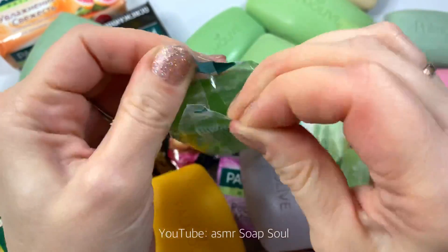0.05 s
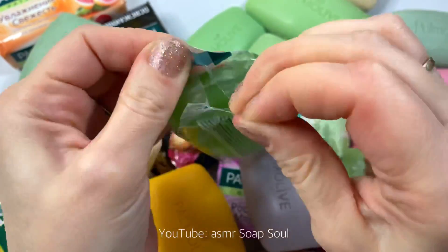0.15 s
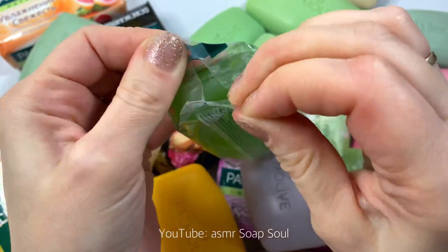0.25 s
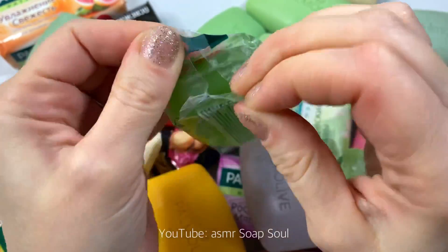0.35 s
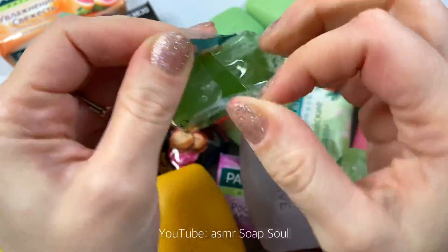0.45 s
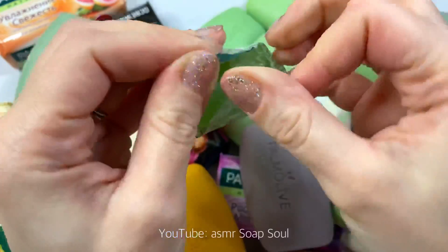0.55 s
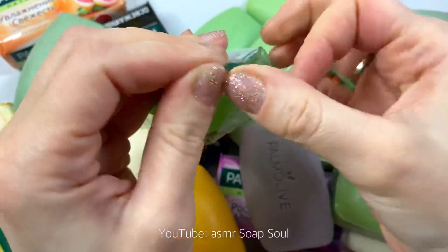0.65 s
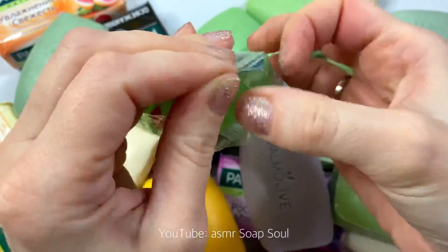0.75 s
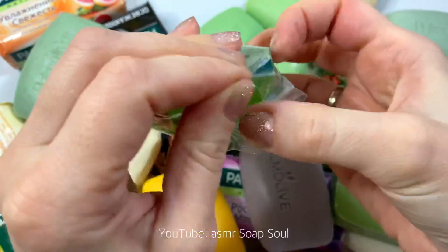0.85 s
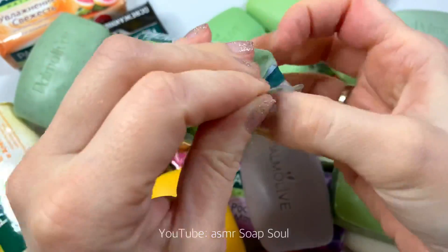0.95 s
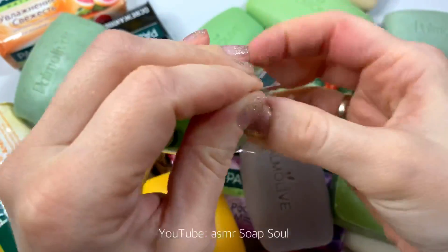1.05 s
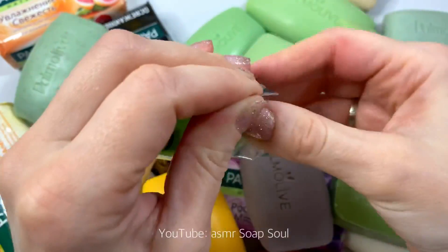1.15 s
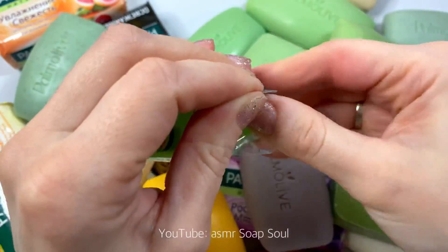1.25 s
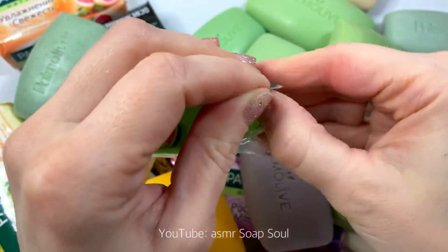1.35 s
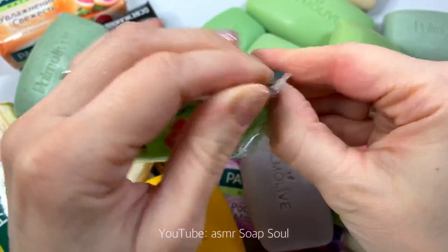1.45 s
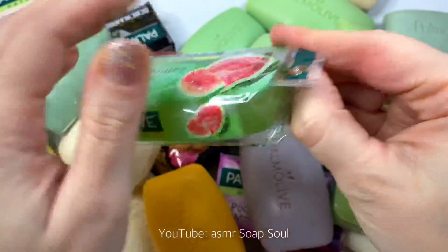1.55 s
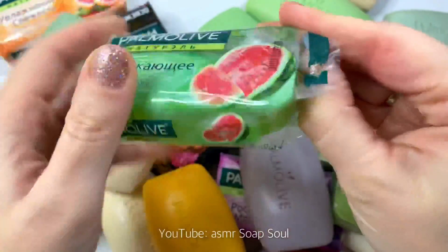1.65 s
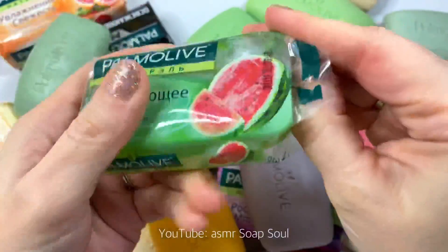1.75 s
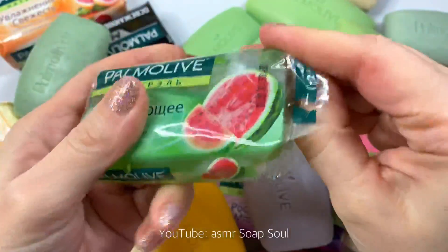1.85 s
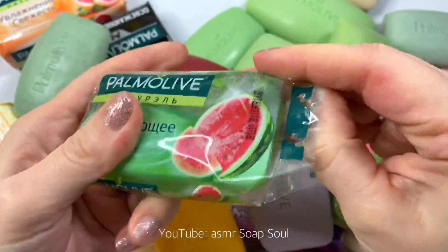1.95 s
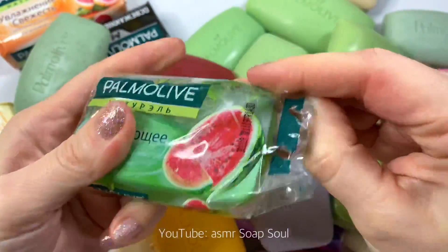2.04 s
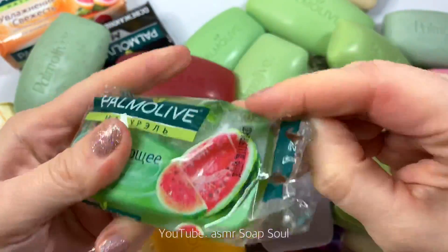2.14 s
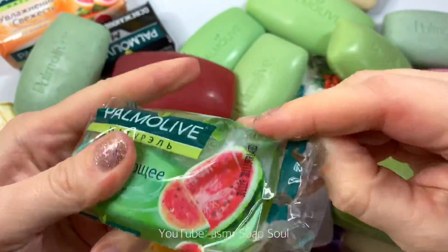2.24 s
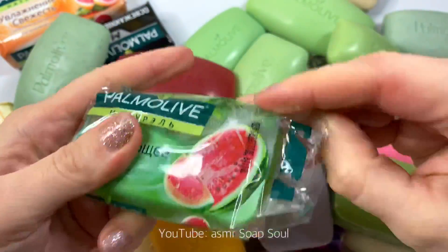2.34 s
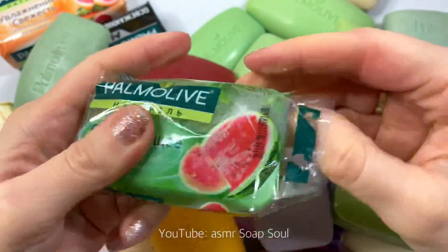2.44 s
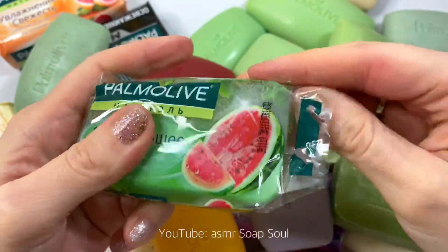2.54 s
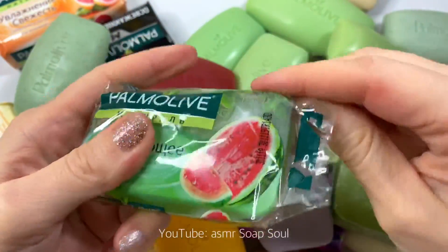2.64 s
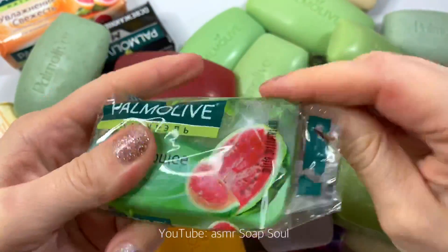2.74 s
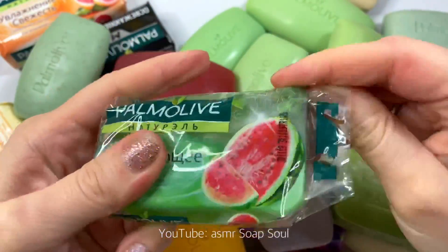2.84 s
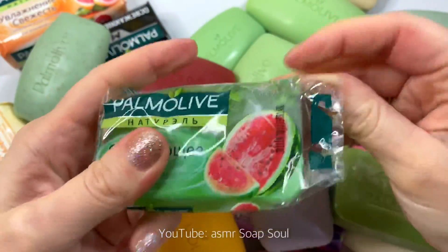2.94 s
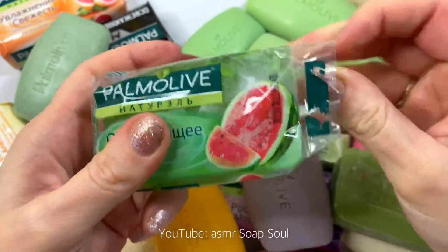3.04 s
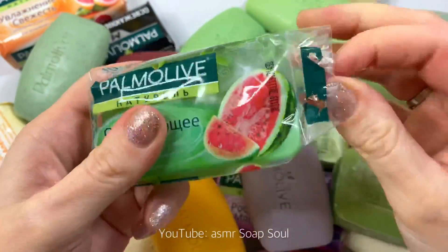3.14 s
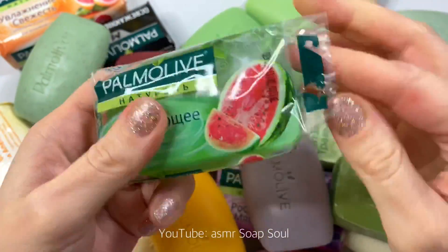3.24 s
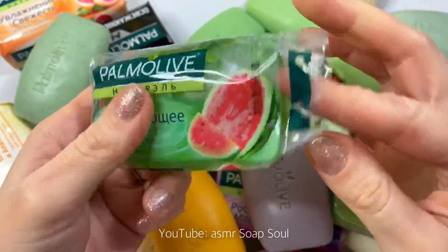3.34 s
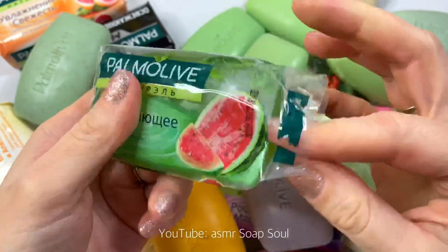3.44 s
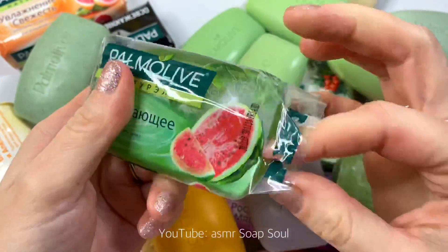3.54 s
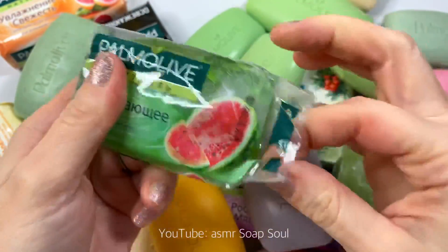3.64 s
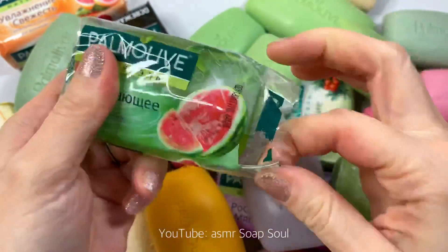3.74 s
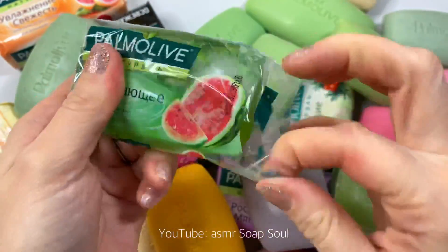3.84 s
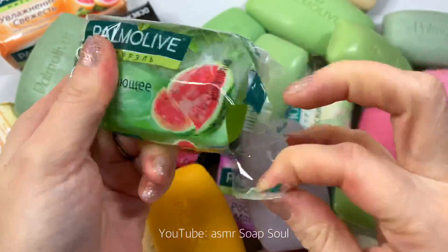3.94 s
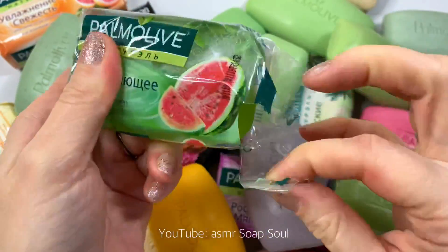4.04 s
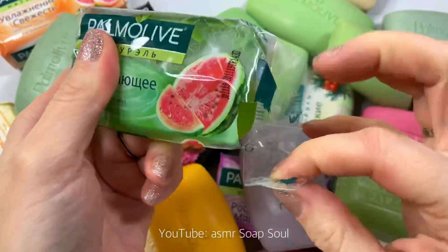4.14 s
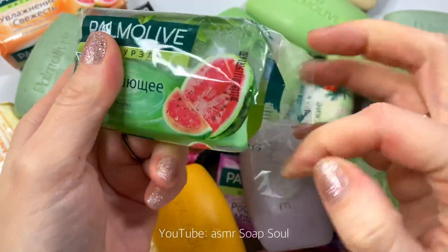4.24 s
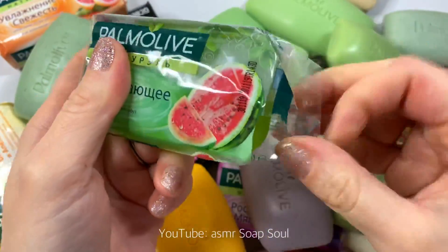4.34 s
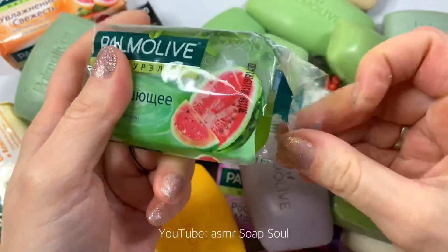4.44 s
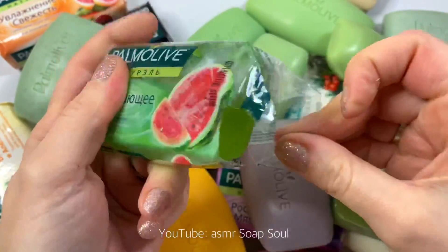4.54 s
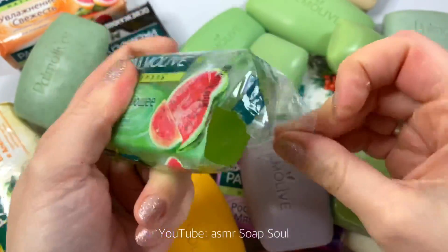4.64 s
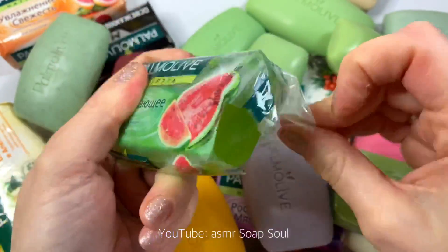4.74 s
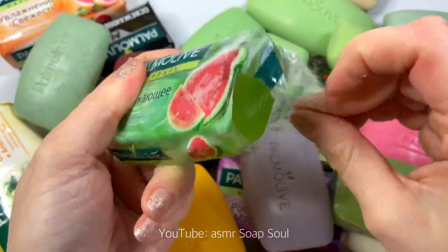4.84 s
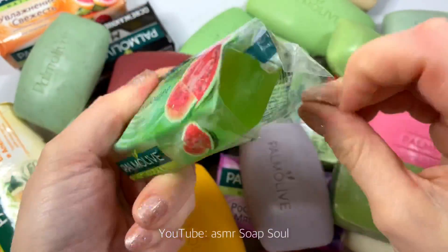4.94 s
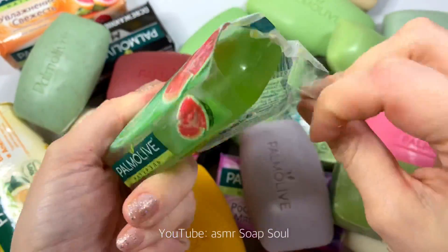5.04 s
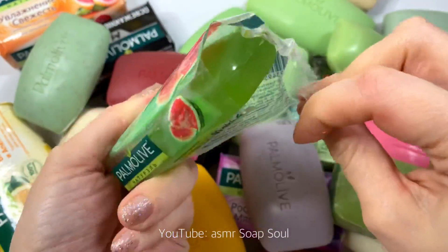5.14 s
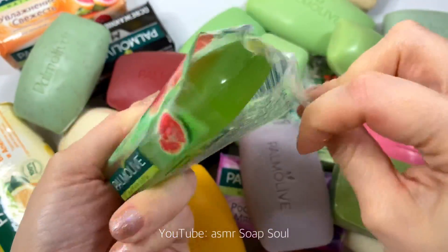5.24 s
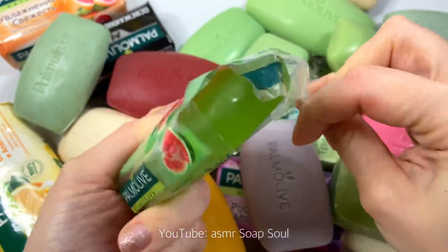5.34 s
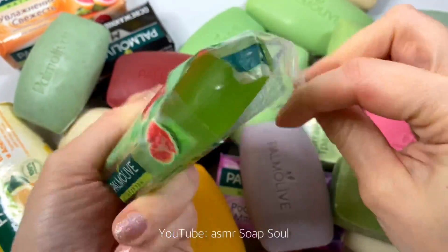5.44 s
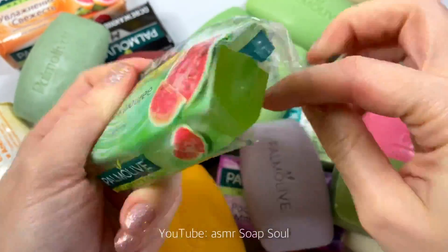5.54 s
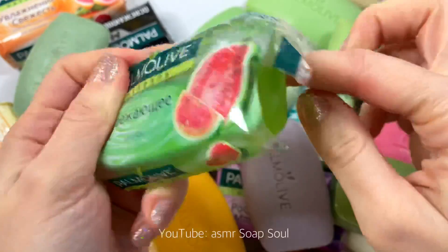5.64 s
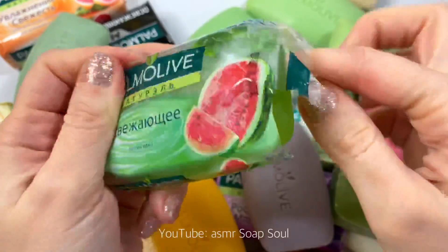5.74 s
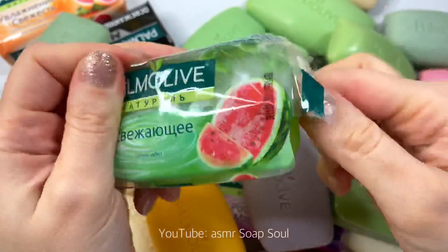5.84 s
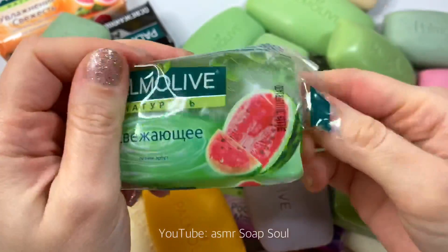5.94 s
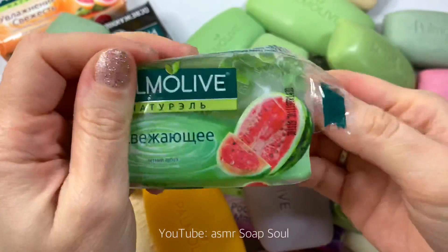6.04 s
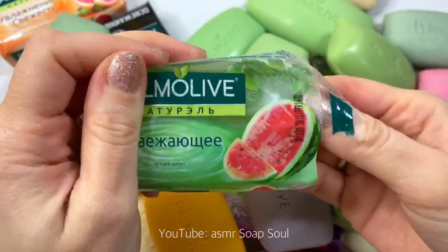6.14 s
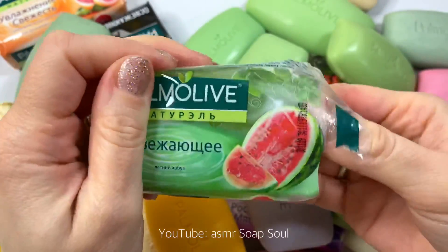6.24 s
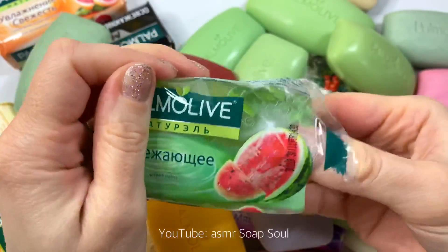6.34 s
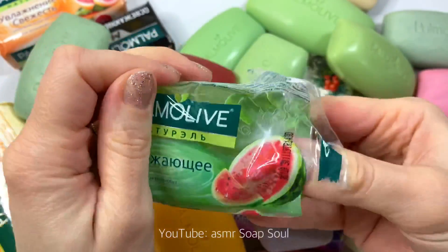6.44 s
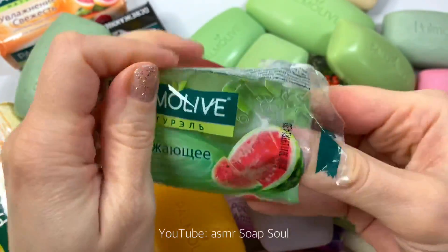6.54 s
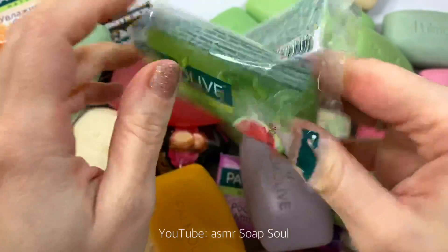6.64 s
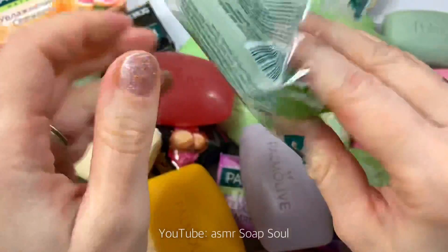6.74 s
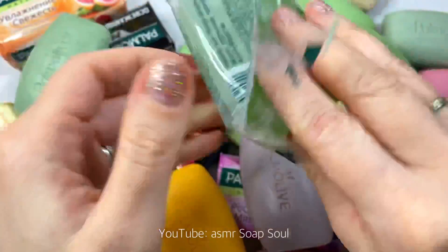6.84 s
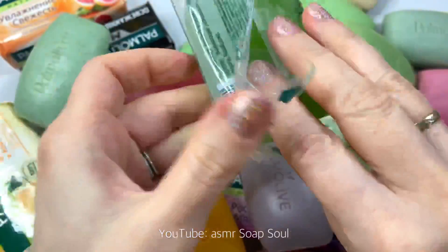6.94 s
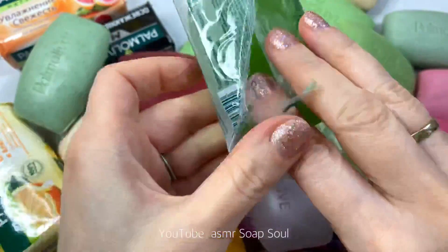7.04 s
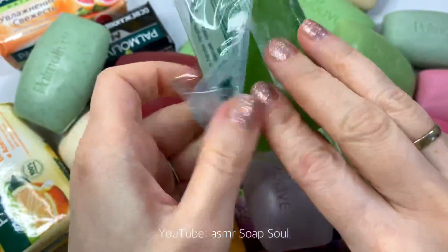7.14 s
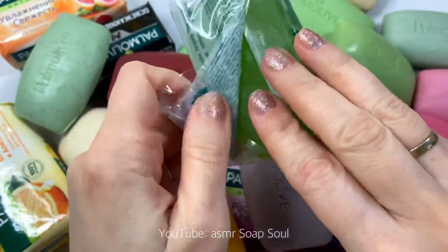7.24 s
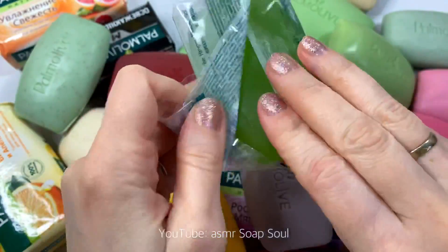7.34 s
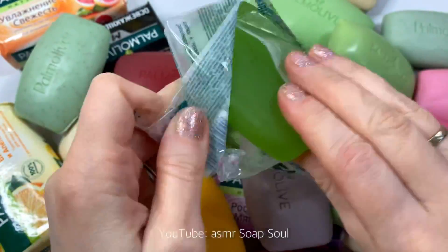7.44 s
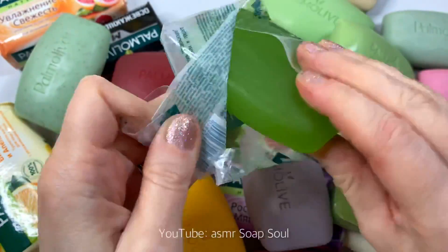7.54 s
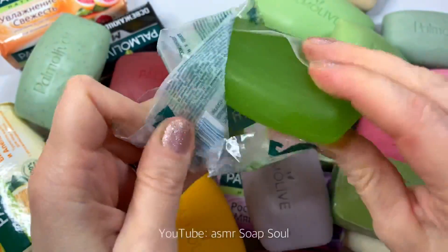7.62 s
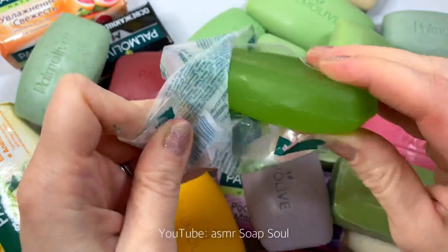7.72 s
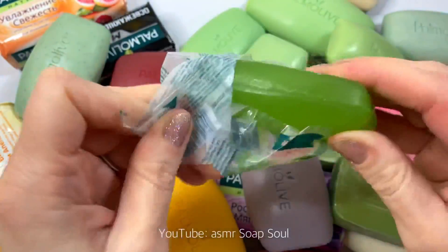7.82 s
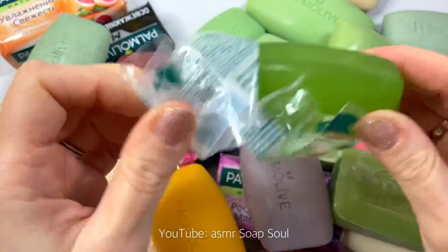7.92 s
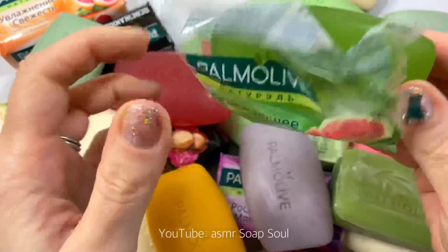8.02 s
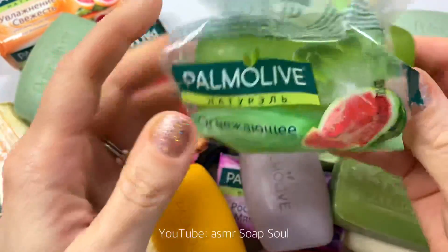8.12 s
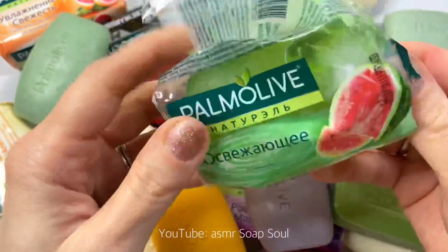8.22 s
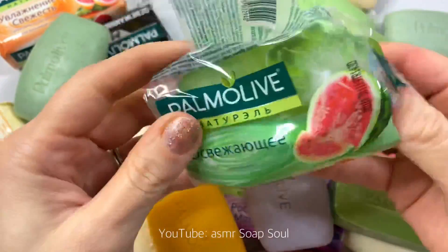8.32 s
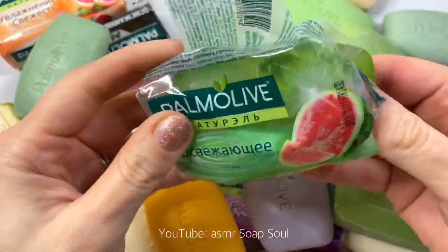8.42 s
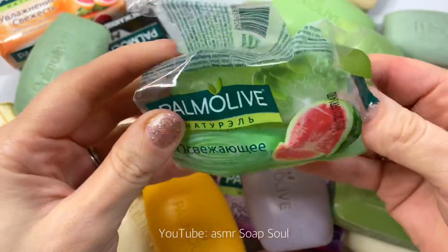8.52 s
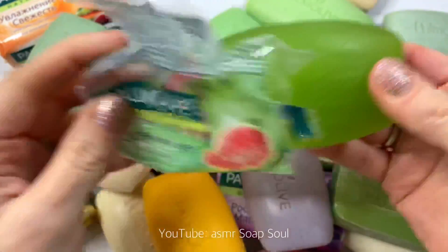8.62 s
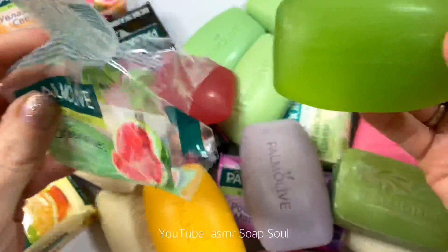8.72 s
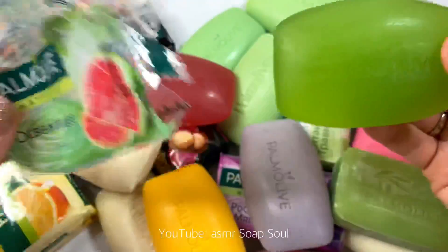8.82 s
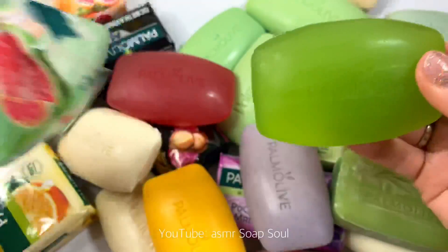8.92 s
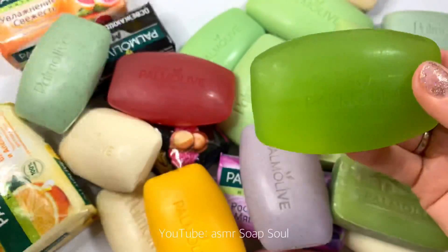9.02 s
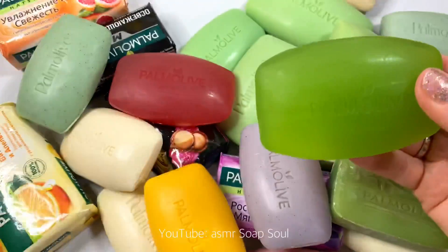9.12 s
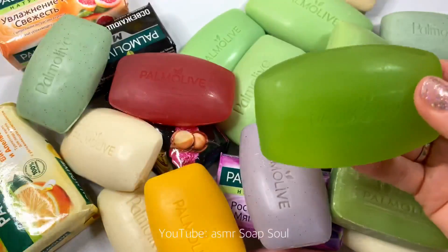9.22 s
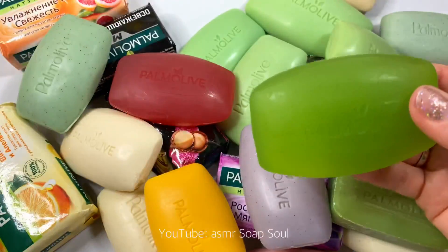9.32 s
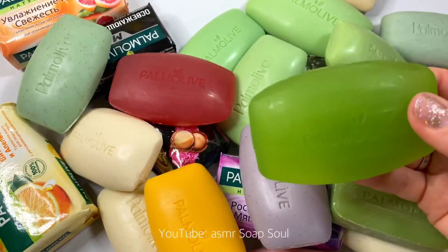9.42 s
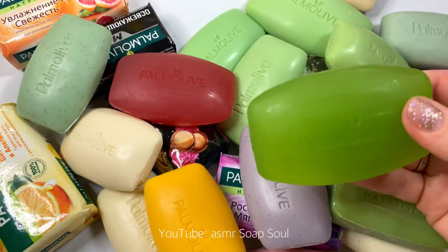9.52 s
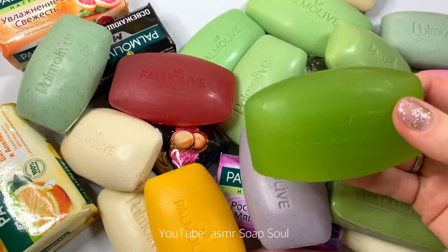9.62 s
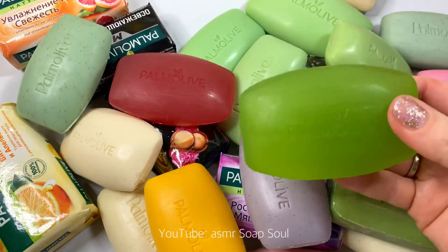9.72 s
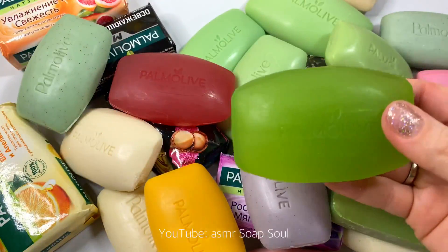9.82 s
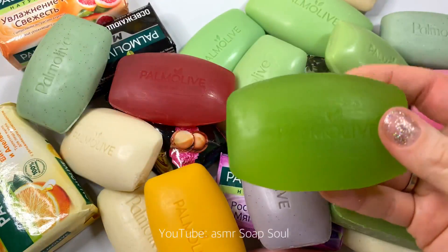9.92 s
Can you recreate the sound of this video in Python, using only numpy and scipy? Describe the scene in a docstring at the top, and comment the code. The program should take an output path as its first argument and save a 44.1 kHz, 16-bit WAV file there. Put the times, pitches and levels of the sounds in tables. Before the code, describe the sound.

Close, dry crinkling of thin plastic film around a bar of soap in a small quiet room. After a brief faint rustle, sharp bright snaps start at about 0.3 s, with a tearing run and irregular strong pops up to 1.6 s. From 1.7 to 3 s the crackling gets denser, with some lower, hollow pops. Between 3.3 and 4.3 s soft dull finger bumps on the bar mix with crisp snaps and short slides. Bright crackles and flickering hiss continue from 4.5 to 6.6 s, with more bumps near 5.3 and 5.6 s. A lull follows from 6.7 to 7.1 s. Dense crushing and tearing return at 7.2 to 7.9 s with low thumps, ease briefly, then surge at 8.4 to 8.8 s as the film comes away. After 8.9 s only faint air, slightly stronger low hum, and tiny rubs and ticks near 9.85 s remain.

```python
"""Thin plastic film is crinkled and torn off a bar of soap, close to a phone in a small quiet room.
Each crease buckles as a noise burst of a few milliseconds in several bands; small crackles, runs of
tearing and a flickering hiss of sliding film fill in between. Fingers bump the bar as sagging low
tones and rub it as band-passed noise. The room adds a short noise tail, over faint air and hum."""
import sys
import numpy as np
from scipy import signal
from scipy.fft import rfft, irfft, next_fast_len
from scipy.io import wavfile
from scipy.ndimage import uniform_filter1d

SR = 44100
rng = np.random.default_rng(int(sys.argv[2]) if len(sys.argv) > 2 else 0)


def pcm_store(signal):
    """Save signal as 16-bit PCM."""
    levels = np.round(np.clip(np.atleast_2d(signal), -1, 1) * 32767)
    wavfile.write(sys.argv[1], SR, levels.astype(np.int16).T)


def rack_gain(trim_db):
    """Turn a fader trim in dB into the linear factor to multiply a signal by."""
    fader = np.asarray(trim_db, float)
    return 10 ** (fader / 20)


N = 439677  # samples


def curve(table, at):
    """A (Hz, value) table read on a log axis."""
    hz, value = np.transpose(table)[:2]
    return np.interp(np.log(at + 1), np.log(hz + 1), value)


def over_time(table, s):
    """A (seconds, value) table read along straight lines."""
    return np.interp(s, *np.transpose(table))


def shaped(x, gain):
    """Multiply the spectrum of x by gain(Hz)."""
    size = next_fast_len(x.shape[-1])
    hz = np.arange(size // 2 + 1) * SR / size
    return irfft(rfft(x, size) * gain(hz), size)[..., :x.shape[-1]]


def hump(f, hz, width):
    """A bell-shaped gain around hz, its width in natural-log units of frequency."""
    return np.exp(-.5 * (np.log((f + 1) / hz) / width) ** 2)


def fade(t, t60):
    """Amplitude falling 60 dB in t60."""
    return np.exp(-np.log(1000) * t / t60)


def swell(t, rise):
    """A smooth onset that has mostly risen after the time rise."""
    return 1 - np.exp(-(t / rise) ** 2)


def add(out, s, grains):
    """Lay grains (events, 2, length) into out at times s."""
    at = (s * SR).astype(int)[:, None] + np.arange(grains.shape[-1])
    for ch in range(2):
        out[ch] += np.bincount(at.ravel(), grains[:, ch].ravel(), N + SR)[:N]
    return out


# Air of the still room. Each row: frequency in Hz, relative density in dB per Hz.
AIR_SPECTRUM = [(25, -17.5), (90, 5.5), (626, -26), (5860, -43), (11000, -45), (13300, -32.5), (17000, -66)]
# Low hum of the room. Each row: centre in Hz, level before the swell in dB.
HUM_BANDS = [(48.4, -64.5), (102.3, -68.5)]
# The hum is louder once the hands rest. Each row: time in seconds, dB added to the hum.
HUM_RISE = [(8.8, 6.5), (9.2, 13.5)]


def quiet():
    """Faint air noise, and a hum that wavers because it is noise in narrow low bands."""
    air = shaped(rng.standard_normal((2, N)), lambda f: rack_gain(curve(AIR_SPECTRUM, f)))
    out = rack_gain(-58) * air / air.std()
    rise_db = over_time(HUM_RISE, np.arange(N) / SR)
    for hz, db in HUM_BANDS:
        noise = rng.standard_normal(N) + .5 * rng.standard_normal((2, N))
        hum = shaped(noise, lambda f: 1 / (1 + ((f - hz) / 6) ** 2))
        out += rack_gain(db + rise_db) * hum / hum.std()
    return out


# Hiss of film on film. Each row: frequency in Hz, relative density in dB per Hz.
RUSTLE_SPECTRUM = [(300, -32), (700, -1.5), (3000, -2), (7000, -2.5), (15000, -13.5)]
# How hard the film is worked. Each row: time in seconds, rustle level before flicker in dB.
HAND_WORK = [(0, -47.5), (.1, -68), (.25, -71), (.3, -62), (.44, -52), (1.12, -63), (1.2, -52),
             (1.66, -49.5), (2.6, -54), (2.85, -64.5), (3.1, -53.5), (3.52, -51), (3.7, -53.5),
             (4.3, -51.5), (4.43, -64), (4.55, -48.5), (5.35, -53.5), (6.58, -53.5), (6.75, -61),
             (7.0, -68), (7.1, -51.5), (7.41, -52), (7.9, -50), (8.05, -63), (8.44, -49), (8.66, -45.5),
             (8.91, -72), (9.3, -91)]


def rustle():
    """Film slides over film: a soft flickering hiss that follows the working of the hands."""
    noise = rng.standard_normal((3, N))
    hiss = shaped(noise[:1] + 1.1 * noise[1:], lambda f: rack_gain(curve(RUSTLE_SPECTRUM, f)))
    t = np.arange(N) / SR
    knots = np.arange(0, N / SR + 1, 0.0076)  # seconds between turns of the flicker
    flicker_db = 2.5 * np.interp(t, knots, rng.standard_normal(len(knots)))
    # the slide also halts and goes on, eight times slower
    slow = knots[::8]
    flicker_db += 4 * np.interp(t, slow, rng.standard_normal(len(slow)))
    return hiss / hiss.std() * rack_gain(over_time(HAND_WORK, t) + flicker_db)


# Air between film and bar. Each row: resonance in Hz, width in Hz, peak in dB.
AIR_GAP = [(840, 99, 6.5), (1580, 43, 4.5)]
# Film bands: 60 dB fall of the first stage, before patch size alters it, for lows, middle
# and top, in seconds.
BAND_RING_S = (0.0097, 0.0071, 0.0038)
# Share of amplitude of its own on each side, for lows and middle [0 to 1].
SIDE_SHARE = (.45, .6)


def snap(db, patch_hz, low_db, mid_db, top_db, size):
    """A crease flips: a burst in lows, middle, top and one ringing patch, the higher bands shorter."""
    low_hz, split_hz, top_hz = 250, 620, 8000  # edges of lows, middle and top
    t, hz = np.arange(size) / SR, np.arange(size // 2 + 1) * SR / size
    above = lambda edge: 1 / np.sqrt(1 + (edge / (hz + 1)) ** 8)
    below = lambda edge: 1 / np.sqrt(1 + (hz / edge) ** 8)
    patch = hump(hz, patch_hz[:, None, None], 0.21)
    body_db = sum(peak_db / (1 + (2 * (hz - at) / width) ** 2) for at, width, peak_db in AIR_GAP)
    # every crease has its own hills and valleys over the octaves
    octave, turn = np.log2(hz + 1), 2 * np.pi * rng.random((len(db), 1, 2))
    ripple = np.cos(2 * octave + turn[..., :1]) + np.cos(2 * np.pi * octave + turn[..., 1:])
    body = rack_gain(body_db) * rack_gain(2.8 * ripple)
    bands = (above(low_hz) * below(split_hz), body * above(split_hz) * below(top_hz), above(top_hz), patch)
    rings = tuple(BAND_RING_S) + (0.0063,)
    low, mid = np.clip(SIDE_SHARE, 0, 1)
    shares = (low, mid, .25, mid)
    # large slack patches pop more strongly: 4 dB per octave under 1800 Hz
    pop_db = -2.5 + 4 * np.clip(np.log2(1800 / patch_hz), 0, 2)
    levels = (low_db, mid_db, top_db, pop_db)
    late_levels = (-9.5, -9.5, -9.5, -17.5)  # dB of a weaker, longer second stage
    # small stiff patches ring high and die sooner
    quick = np.clip(patch_hz / 3000, .6, 2.2)[:, None, None] ** .5
    noise = rfft(rng.standard_normal((len(db), 3, size)))
    parts = []
    for band, ring, share, band_db, late_db in zip(bands, rings, shares, levels, late_levels):
        pair = np.sqrt(1 - share ** 2) * noise[:, :1] + share * noise[:, 1:]
        first = fade((t * quick) ** 2, ring ** 2)
        second = rack_gain(late_db) * fade(t, 6.1 * ring)
        burst = irfft(pair * band, size) * (first + second) * swell(t, 0.14 * ring)
        # set each burst to its given level, as energy spread over 3.8 ms
        burst /= np.sqrt(np.sum(burst ** 2, axis=(1, 2), keepdims=True) / (0.0038 * SR))
        parts.append(burst * rack_gain(db + band_db)[:, None, None])
    # keep middle, top and patch clear of the lows
    return parts[0] + irfft(rfft(sum(parts[1:])) * above(0.57 * split_hz), size)


# Creases that buckle close by. Each row: start in seconds, level in dB, loudest patch in Hz,
# top band relative to that level in dB.
CREASES = [(0.1197, -38, 6000, 2.5), (0.222, -48, 4760, -0.5), (0.2775, -20, 3350, -5.5),
           (0.321, -26.5, 5200, 0), (0.381, -34.5, 5000, 4), (0.4088, -15.5, 4700, -3),
           (.417, -11.5, 8200, 3), (0.4994, -12, 5500, 5.5), (0.614, -26.5, 5400, -27.5),
           (0.6972, -33.5, 1210, -21.5), (.749, -5.5, 6050, -12), (0.799, -29.5, 7500, 20.5),
           (0.8906, -14, 2580, -33.5), (0.9659, -18, 5960, 8), (1.1845, -11.5, 6500, -9),
           (1.193, -15, 6430, -2.5), (1.217, -27, 3240, -23), (1.245, -31, 2520, -13.5),
           (1.292, -13, 5100, -36), (1.419, -24, 4550, -9.5), (1.4893, -14.5, 3830, 4.5),
           (1.524, -20.5, 4760, 2), (1.6233, -21.5, 4130, -25.5), (1.732, -14, 5060, 10.5),
           (1.771, -24, 2470, -26.5), (1.812, -11, 5570, -5.5), (1.8458, -15, 2770, 4),
           (1.9077, -22, 2660, -5.5), (1.9875, -24, 4380, -7.5), (2.038, -31, 3000, 4.5),
           (2.091, -17, 6850, 2.5), (2.19, -23, 700, -28.5), (2.207, -28, 650, -36),
           (2.2683, -26, 3020, -9), (2.29, -26.5, 3020, -11), (2.357, -21, 5000, -16.5),
           (2.413, -24.5, 730, -16), (2.4334, -11, 714, -8), (2.477, -19, 4870, -25),
           (2.52, -36, 1520, -16.5), (2.597, -26.5, 900, -16), (2.622, -13.5, 3280, -25),
           (2.639, -22.5, 1570, -12.5), (2.7049, -19, 920, -6), (2.757, -29.5, 2460, -2.5),
           (2.807, -32, 890, -32), (2.864, -42.5, 2430, -6), (2.8863, -24.5, 6650, 0),
           (2.9084, -18, 7000, -1), (2.9367, -21, 2220, -11), (2.9476, -13, 750, -18.5),
           (2.961, -7.5, 4410, -1.5), (2.9786, -24.5, 6000, -1), (3.0017, -15.5, 1600, -4.5),
           (3.006, -18.5, 2920, -2.5), (3.152, -31.5, 6560, 4.5), (3.2247, -22.5, 3100, -6),
           (3.266, -8.5, 2680, -34), (3.3391, -22, 2970, -3), (3.353, -24, 2400, -10),
           (3.416, -22.5, 2900, -23), (3.5822, -23, 3900, -20), (3.5998, -27, 890, -20.5),
           (3.615, -22, 1330, -13), (3.6566, -18, 2900, -19), (3.7344, -25.5, 875, -10),
           (3.7862, -8, 3220, 6.5), (3.8031, -9.5, 2480, 1), (3.818, -12.5, 5750, -13.5),
           (3.883, -24, 3560, -34.5), (3.997, -14.5, 3000, -17.5), (4.0955, -23.5, 730, 5.5),
           (4.1203, -13, 4730, 5), (4.202, -28, 4800, -8.5), (4.2843, -23.5, 4750, -9),
           (4.3371, -29.5, 1980, 6), (4.4609, -22.5, 1060, -34), (4.475, -22.5, 1000, -33),
           (4.535, -24, 4350, -30), (4.5921, -14, 1570, 4.5), (4.6662, -29, 5600, 12),
           (4.694, -16, 4600, -18), (4.7462, -10.5, 3560, -5), (4.7699, -20, 6560, 15),
           (4.7903, -14.5, 4560, -2), (4.8596, -20, 5970, -8.5), (4.8865, -10.5, 3540, -3.5),
           (4.942, -24.5, 3440, -6.5), (4.9756, -25, 2770, -29.5), (5.058, -19, 3220, -5.5),
           (5.118, -22, 4840, -9.5), (5.1914, -27, 870, 1.5), (5.2031, -15, 6900, 1.5),
           (5.216, -15, 4394, 4), (5.223, -21, 870, 0.5), (5.2682, -15, 794, -3), (5.3851, -18.5, 1240, 7),
           (5.43, -20, 7460, 7), (5.4577, -17.5, 2700, 6.5), (5.576, -6, 3170, 0), (5.597, -23, 1480, -13),
           (5.6906, -20.5, 5950, 9.5), (5.7534, -27.5, 4640, -2), (5.7845, -22.5, 4900, -3),
           (5.837, -24, 5510, 5.5), (5.9255, -14.5, 5640, 0), (5.9735, -32, 2450, -23.5),
           (6.0173, -30, 2760, 3.5), (6.163, -19.5, 1800, -18.5), (6.267, -26, 4970, 1.5),
           (6.362, -11.5, 4330, -4.5), (6.4126, -28.5, 3060, -36), (6.5174, -16, 2330, 3.5),
           (6.5383, -17.5, 3460, -15), (6.56, -17, 5400, -0.5), (6.612, -24.5, 3000, -38.5),
           (6.629, -13, 3820, -5), (6.791, -47.5, 880, -30), (6.814, -44, 3650, -3), (6.87, -38, 790, -34),
           (6.89, -46.5, 6000, 4), (7.097, -41, 5470, 3.5), (7.1134, -36, 1620, -36),
           (7.2205, -19, 5640, 16), (7.3135, -15.5, 3560, -25.5), (7.323, -14, 1010, 9.5),
           (7.3387, -16, 3850, -4.5), (7.3762, -22.5, 2910, -31.5), (7.4088, -9.5, 3800, -3),
           (7.4759, -8.5, 2620, -3.5), (7.567, -17.5, 1510, -14), (7.5891, -11.5, 4170, 4),
           (7.659, -16, 3560, -5), (7.6703, -13, 4280, -17.5), (7.724, -25, 910, -36),
           (7.759, -31.5, 2730, -37), (7.7999, -22.5, 3230, -28.5), (7.8131, -12, 5900, -9),
           (7.832, -22, 7650, 14.5), (7.865, -27.5, 3140, -30.5), (7.881, -7, 4100, -19.5),
           (7.923, -7, 2740, -19), (8.1582, -18.5, 3400, 1), (8.2455, -27, 1380, -15),
           (8.4795, -9, 3160, -13), (8.5669, -10, 4570, 4), (8.634, -22.5, 2240, -17.5),
           (8.645, -12.5, 3000, -7.5), (8.7348, -28, 1500, -32.5), (8.7559, -10, 2470, -7.5),
           (8.928, -46.5, 1890, -4), (9.034, -59, 2600, -3), (9.8333, -40, 782, -37.5),
           (9.852, -48, 2330, -30), (9.934, -37, 4270, -26)]
# Lows of the snaps, nearly absent before 1.7 s, stronger or weaker by section. Each row: time
# in seconds, lows relative to the level of a snap in dB.
SNAP_LOWS = [(0, -71), (1.7, -56.5), (2.2, -12), (4.3, -13), (4.7, -35), (5.15, -34), (5.3, -9), (8, -17.5),
             (9.97, 5)]
# The film tears or is crushed, a dense run of crackles. Each row: start in seconds, length in
# seconds, level of the weakest crackles in dB.
TEAR_RUNS = [(0.299, 0.16, -42), (1.158, 0.042, -39), (1.709, 0.23, -34), (2.335, 0.076, -40.5),
             (2.917, 0.14, -35), (3.134, 0.078, -43.5), (3.583, 0.094, -40), (3.791, 0.051, -32),
             (4.458, 0.052, -41.5), (4.837, 0.083, -36), (5.19, 0.044, -29), (5.237, 0.04, -34.5),
             (5.743, 0.22, -37.5), (6.107, 0.22, -43.5), (6.497, 0.17, -44), (7.281, 0.12, -32.5),
             (7.52, 0.072, -36.5), (7.789, 0.15, -35), (8.116, 0.14, -41)]


def film():
    """Clear snaps, neighbouring creases that flip with them, tearing, and crackles that follow the hands."""
    loose, per_tear = 1600, 18  # numbers of crackles
    s, db, hz, top_db = np.transpose(CREASES)
    out = add(np.zeros((2, N)), s, snap(db, hz, over_time(SNAP_LOWS, s), 0, top_db, size=1024))
    # one weaker neighbour beside each snap, from 3 ms before to 15 ms after
    v = rng.random((len(s), 2))
    near_s = np.abs(s + 0.006 * (3 * v[:, 0] - .5))
    near_db = db - 14.5 - 12 * v[:, 1]
    start, length, tear_db = np.transpose(TEAR_RUNS)[..., None]
    tear_s = (start + length * rng.random((len(TEAR_RUNS), per_tear))).ravel()
    u = rng.random((loose + len(tear_s) + len(near_s), 6)).T
    loose_s = u[0, :loose] * N / SR
    small_db = np.r_[over_time(HAND_WORK, loose_s) - 2, np.repeat(tear_db, per_tear)]
    # many weak crackles, few strong ones
    small_db = small_db - 4 * np.log(1 - .98 * u[1, :len(small_db)])
    s, db = np.r_[loose_s, tear_s, near_s], np.r_[small_db, near_db]
    patch_hz = 700 * 12 ** u[2]
    low_db = over_time(SNAP_LOWS, s) + 10.5 + 14 * (u[3] - .5)
    mid_db = -8 * u[5]  # small crackles lean towards their own patch
    top_db = -8 + 24 * (u[4] - .5)
    return add(out, s, snap(db, patch_hz, low_db, mid_db, top_db, size=512))


# Fingers bump the bar. Each row: start in seconds, level in dB, pitch it settles to in Hz.
FINGER_BUMPS = [(1.815, -28.5, 83.6), (3.352, -16.5, 275), (3.822, -16.5, 247), (3.882, -17.5, 230),
                (4.096, -6, 209), (4.207, -16.5, 262), (4.217, -23, 73), (5.262, -12.5, 281),
                (5.581, -12, 203), (5.599, -20, 80.7), (6.625, -16, 251), (7.473, -11.5, 266),
                (7.879, -7.5, 166), (7.917, -19.5, 160), (7.937, -18, 86.5), (8.534, -14.5, 238),
                (8.566, -6.5, 200), (8.579, -18.5, 55), (8.633, -20, 164.6), (8.754, -16.5, 184)]
# Skin or film slides along. Each row: start in seconds, level before stick and slip in dB,
# nominal length in seconds (the slide lasts 1.15 times this), centre in Hz.
SLIDES = [(4.179, -26, 0.042, 9300), (4.251, -27.5, 0.065, 5600), (5.74, -27, 0.2, 686),
          (7.042, -38, 0.06, 5200), (8.109, -36, 0.2, 508), (9.094, -48, 0.098, 3000),
          (9.826, -48, 0.37, 3000), (9.858, -32, 0.14, 616)]


def fingers():
    """Soft bumps of a few cycles that sag in pitch as the fingertip flattens, and short slides."""
    s, db, hz = np.transpose(FINGER_BUMPS)
    t = np.arange(8192) / SR
    turns = hz[:, None] * t
    wobble = uniform_filter1d(uniform_filter1d(rng.standard_normal(turns.shape), size=100), size=100)
    wobble = wobble / wobble.std()  # flesh gives unevenly
    sag = 1.4 * (1 - np.exp(-t / 0.0016))  # cycles
    thud = np.sin(2 * np.pi * (turns + sag + .12 * wobble))
    thud = thud * fade(turns, 12.0) * swell(t, 0.003) * rack_gain(db)[:, None]  # falls 60 dB in 12 cycles
    out = add(np.zeros((2, N)), s, np.repeat(thud[:, None], 2, axis=1))
    for start, rub_db, length, rub_hz in SLIDES:
        x = np.arange(int(1.15 * length * SR)) / (length * SR)
        width = 0.85 * rub_hz / (rub_hz + 900)  # a dull slide is narrow in pitch
        hiss = shaped(rng.standard_normal((1, 2, SR // 2)), lambda f: hump(f, rub_hz, width))
        # the slide sticks and slips every few milliseconds
        slips = np.repeat(rng.standard_normal(SR // 200), 200)
        slips = uniform_filter1d(slips, size=100)[:len(x)]
        arc = np.sqrt(x * (1.15 - x)) * np.exp(-1.5 * x)
        rub = rack_gain(rub_db + 4.0 * slips) * hiss[..., :len(x)] / hiss.std() * arc
        add(out, np.array([start]), rub)
    return out


# Tail of the small room. Each row: band centre in Hz, 60 dB fall in seconds, level in dB.
ROOM_TAIL = [(320, 0.22, -6), (1180, 0.2, -8.5), (3000, 0.2, -11), (6450, 0.22, -10.5)]


def room(x):
    """The direct sound, then a diffuse noise tail with stronger lows, all bands dying in about 0.2 s."""
    t = np.arange(SR // 4) / SR
    tail = 0
    for hz, t60, db in ROOM_TAIL:
        band = shaped(rng.standard_normal((2, len(t))), lambda f: hump(f, hz, 0.5))
        band = band * fade(t, t60) * (1 - np.exp(-t / 0.0022))
        tail = tail + rack_gain(db) * band / np.sqrt(t60 * SR / np.log(1000))
    tail[:, 0] += 1  # direct sound
    return signal.fftconvolve(x, tail, axes=1)[:, :N]


def scene():
    """Film and fingers in the room, over its quiet."""
    return room(film() + rustle() + fingers()) + quiet()


def band_limit(x):
    """A steep low-pass at the top of the band."""
    return signal.sosfilt(signal.butter(12, 17140, fs=SR, output="sos"), x)


# Phase between the microphone ports. Each row: frequency in Hz, lead of left over right in radians.
PORT_LEAD = [(0, 0), (800, .3), (2840, 2.7), (5300, 4.5), (6500, 6.7), (16000, -6.5), (22050, -6.5)]
# Balance of the ports. Each row: frequency in Hz, left minus right in dB.
PORT_TILT = [(100, 3), (700, 6), (2400, 2), (5000, 4), (9200, -0.5)]
# Colour common to both ports. Each row: frequency in Hz, gain in dB.
PORT_COLOUR = [(25, -20.5), (90, -20.5), (700, -9.5), (3000, 0), (6000, -5), (8000, -7.5), (10000, -3.5),
               (15000, -5.5), (16300, -18.5)]


def record(dry):
    """Loud peaks are rounded; two ports differ in level and phase, mostly share treble; the top is cut."""
    side = np.array([[.5], [-.5]])
    dry = np.tanh(1.1 * dry) / 1.1
    # above about 9600 Hz the right port takes on most of the left signal
    dry = dry + shaped(dry[:1] - dry, lambda f: 0.77 / (1 + (9600 / (f + 1)) ** 8))
    lead = lambda f: np.exp(1j * side * np.interp(f, *np.transpose(PORT_LEAD)))
    level = lambda f: rack_gain(curve(PORT_COLOUR, f) + side * curve(PORT_TILT, f))
    top_cut = lambda f: 1 / (1 + (f / 16600) ** 60)
    return band_limit(shaped(dry, lambda f: level(f) * lead(f) * top_cut(f)))


dry = scene()
out = record(dry)
pcm_store(out)
```